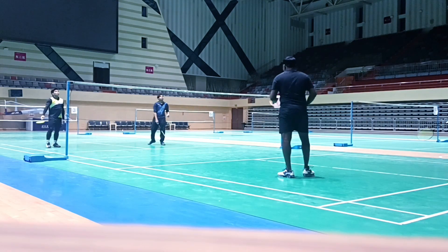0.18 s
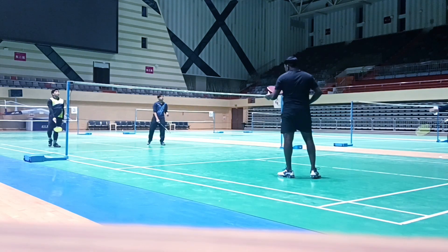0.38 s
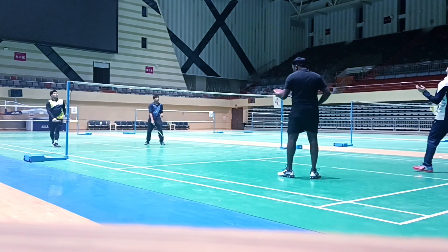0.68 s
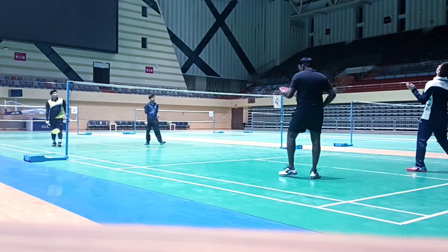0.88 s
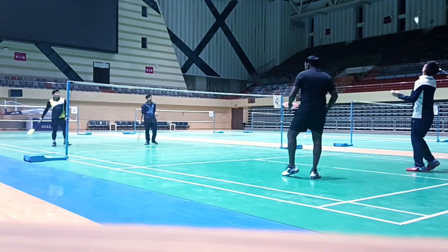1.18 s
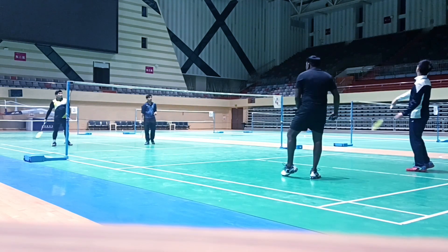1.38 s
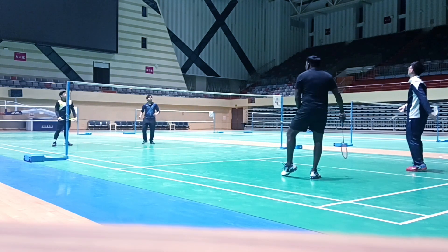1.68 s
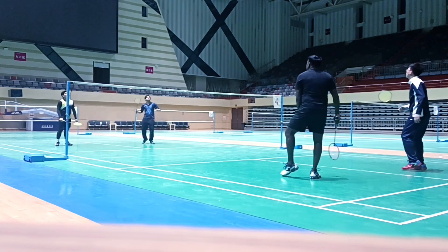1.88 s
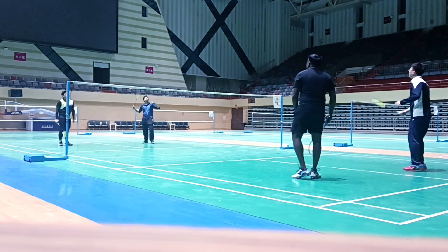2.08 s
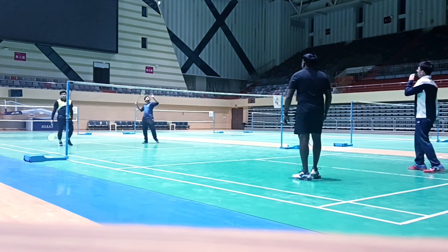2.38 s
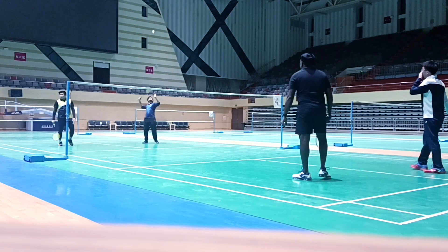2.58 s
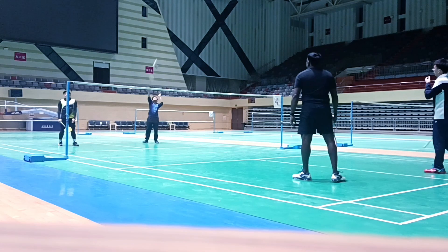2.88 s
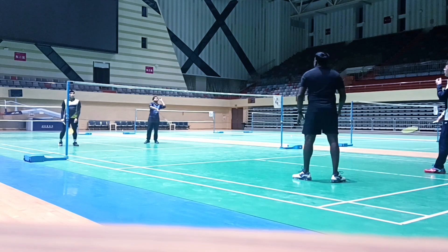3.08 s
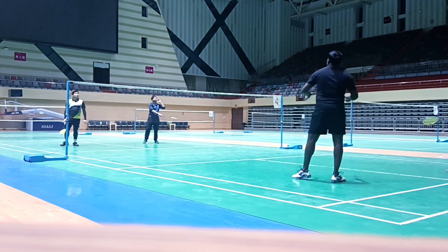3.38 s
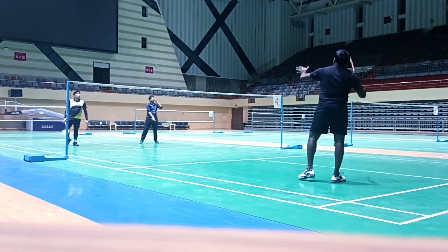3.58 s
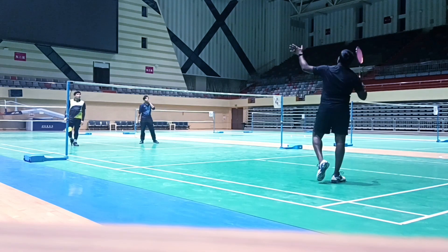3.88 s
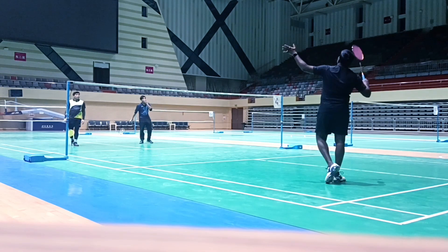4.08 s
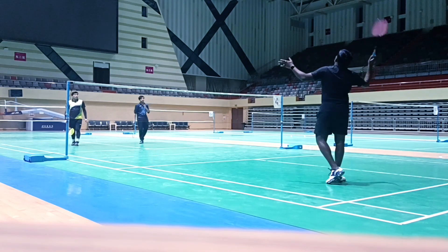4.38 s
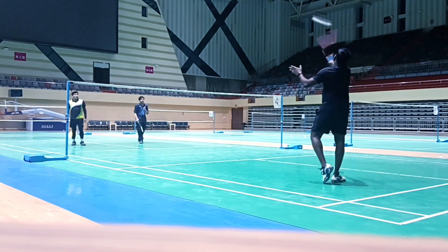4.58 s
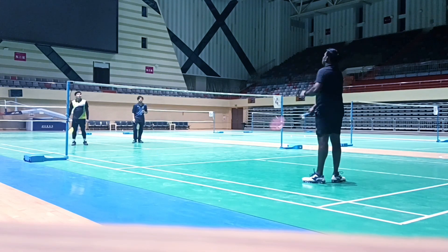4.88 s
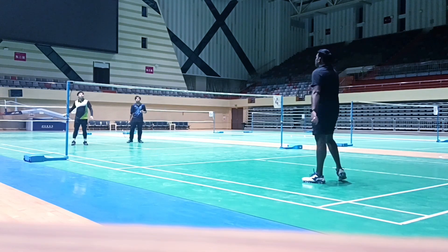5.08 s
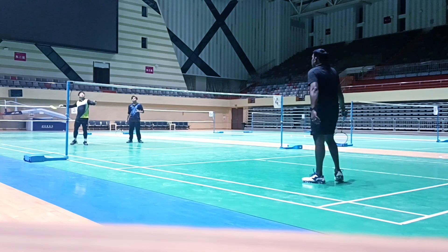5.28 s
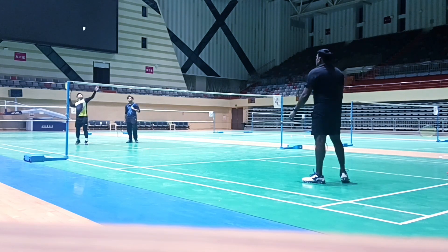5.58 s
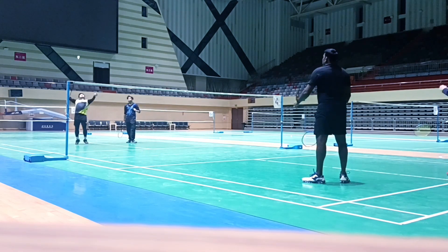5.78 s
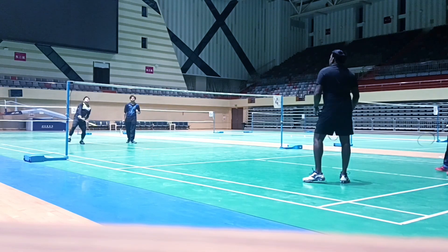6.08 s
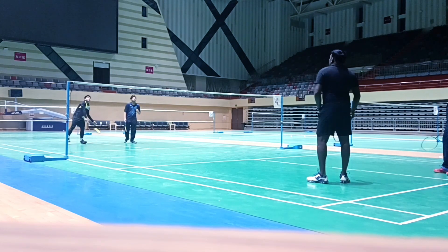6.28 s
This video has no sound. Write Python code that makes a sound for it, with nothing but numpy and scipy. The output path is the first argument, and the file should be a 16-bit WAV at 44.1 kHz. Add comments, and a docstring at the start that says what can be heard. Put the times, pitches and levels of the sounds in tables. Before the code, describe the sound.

The fading ring of an earlier hit opens the scene, with light footsteps on a hollow wooden floor. Then come four crisp racket pops, alternating between near and far players, the third nearest and strongest in its direct crack, the last followed by bright slapping echoes. Each tail washes through a huge indoor hall. Quiet air noise and faint hiss continue throughout, heard in stereo from courtside.

```python
"""A large, empty sports hall: a badminton rally heard from the side of the court.
Each stroke is a noise swish, a burst filtered by racket resonances and a ping of decaying sines.
Near wall, stands and court return shaped bursts and noise; the hall blooms and decays as diffuse noise.
Separate slaps return from far walls and roof. Shoes excite the modes of a sprung floor.
Below lie ventilation noise, a low hum, one swell of rustle and the recorder's hiss."""
import sys
import numpy as np
from scipy import signal
from scipy.fft import rfft, irfft
from scipy.io import wavfile
from scipy.ndimage import uniform_filter1d

SR = 44100
rng = np.random.default_rng(int(sys.argv[2]) if len(sys.argv) > 2 else 0)


def store_wav(level_fs):
    """Save 16-bit WAV to argv[1]."""
    pcm = np.round(np.clip(np.atleast_2d(level_fs), -1, 1) * 32767)
    wavfile.write(sys.argv[1], SR, pcm.T.astype(np.int16))


N = 284156

# Strokes. Each row: start in seconds, end of the court, crack level in dB, string note in Hz, its level
# in dB, string overtone in Hz, its level in dB, string T60 in seconds, near-wall delay in seconds,
# wall level in dB, hall level in dB, hall boom centre in Hz, boom surge in dB. Levels are before tone balance.
STROKES = [(1.5545, "near", -20, 957, -39, 1985, -45, 0.098, 0.011, -19.5, -21.5, 513, 2.5),
           (3.182, "far", -22, 1022, -35, 4050, -49, 0.12, 0.014, -20, -23, 540, 6),
           (4.86, "near", -15.5, 1540, -51, 6500, -39, .11, .0119, -17.5, -20.5, 750, -1.5),
           (6.2096, "far", -21, 1500, -37, 6960, -56, 0.242, .016, -22.5, -18.5, 590, 4)]
# Tone balance, a row a stroke: triples of low knock, middle bite and high sheen in dB,
# for the direct crack, the wall return and the hall.
TONE_BALANCE_DB = [((2.5, -2.5, -3), (2, 0, -1), (-1.5, 0.5, 0.5)), ((1.5, -1.5, -5.5), (-1.5, -3, -1),
                   (0, 1, -2)), ((1.5, -3.5, -5.5), (-2.5, .5, 3), (1, 0, 1.2)), ((-4.5, 2.5, -6.5),
                   (0, 4, -2), (1, 0.5, 1.5))]
# Resonances of racket and cork, a list a stroke. Each row: centre in Hz, half-width in Hz, level in dB.
RACKET_MODES = [
    [(434, 120, -4.5), (820, 117, 6.5), (1635, 105, 11.5), (1986, 160, 13.5), (2250, 150, 9),
     (2540, 190, 9), (3420, 96, 4.5), (3880, 170, 6.5), (4092, 150, 4), (5257, 78, -1), (6190, 390, 6.5),
     (7000, 690, 1.5)],
    [(330, 34, 6), (534, 110, 5), (1017, 45, 9.5), (2132, 310, 4.5), (2618, 220, 3), (3130, 160, 7),
     (4080, 470, 11.5), (4650, 190, 7.5), (5300, 90, -2.5), (6524, 190, -8), (6860, 86, 5), (7670, 130, -4)],
    [(250, 57, 3.5), (583, 128, 11.5), (755, 140, 12), (1520, 240, 12), (1990, 140, 11), (2220, 110, 7),
     (2795, 110, 4), (3160, 150, 5), (4102, 102, 0), (4528, 205, -3.5), (5670, 100, 3.5), (6500, 160, 6),
     (6780, 96, 8)],
    [(468, 92, 15.5), (890, 104, 15.5), (1452, 210, 12.5), (1780, 120, 1.5), (2260, 163, -3.5),
     (3100, 200, 6), (3930, 400, 6.5), (4730, 310, 5.5), (5700, 310, 12.5), (6250, 310, 7.5),
     (6970, 195, 14), (7540, 160, 8.5)],
]
# Broad crack of cork on strings under the resonances. Each row: frequency in Hz, level in dB.
CRACK_SPECTRUM = [(40, -26), (130, -7), (250, -7), (1200, -23), (2500, -6), (5000, -5), (7600, -2.5),
                  (13000, -7.5)]
# Two ends of the court by name. Each entry: left-right difference in dB, lead of the right ear in ms,
# wall left-right difference in dB, wall smear in seconds, wall scatter in dB, stands delay in seconds,
# stands level in dB re wall, hall boom in dB, boom delay in seconds.
COURT_ENDS = {"near": (-1.3, -.05, -1.5, .0065, 8.5, .0455, -8.4, 7.3, .075),
              "far": (-5.2, .3, 3.7, .0035, 6, .04, -13, 6.7, .055)}
# Swings before the strokes. Each row: start in seconds, length in seconds, level in dB before the
# loudness arch, top pitch in Hz.
SWINGS = [(1.533, 0.025, -41, 900), (3.136, .03, -52, 520), (4.809, 0.061, -40.5, 750),
          (6.156, 0.059, -49.5, 740)]
# Sound sent to the walls against the direct crack. Each row: frequency in Hz, difference in dB.
WALL_TILT = [(200, 1), (500, -0.5), (900, -7.5), (2000, 0.5), (4000, 0.6), (6700, 2), (13000, 2)]
# Short waves scatter, long ones arrive in one piece. Each row: frequency in Hz, scatter in dB.
SCATTER_SPECTRUM = [(400, -8), (1200, -2), (3000, 0.5), (8000, 1)]
# Hall reverberation. Each row: frequency in Hz, relative level in dB.
HALL_SPECTRUM = [(60, -19), (150, 1.5), (300, .5), (800, 4), (1030, 3.5), (1180, -3), (1550, 3),
                 (2000, 0.5), (3000, -0.5), (4500, 2), (5100, 0), (6700, -0.5), (8000, -6), (13500, -7)]
# Nominal hall decay; the bend of the decay curve slows it slightly. Each row: frequency in Hz, T60 in seconds.
HALL_T60_S = [(80, 2.1), (250, 1.9), (600, 2.09), (1500, 1.744), (4000, 1.256), (7000, 1.23), (14000, 1.05)]
# Slaps off far walls and roof, plus one return from the stands at 4.913 s. Each row: arrival in seconds, #
# level in dB, left-right difference in dB, favoured frequency in Hz.
ECHOES = [(1.728, -45, -3.5, 4500), (1.7333, -40, 2, 6300), (1.747, -41, 1, 2600), (1.798, -42.5, 0, 2400),
          (3.227, -42, 0.5, 2300), (3.264, -45, 3, 4500), (3.326, -42, 6, 1930), (3.418, -44, -2, 4500),
          (4.913, -37, 1, 3900), (4.954, -44.5, 11, 6600), (5.032, -38, 4, 2400), (5.056, -43.5, 3, 2800),
          (6.2736, -39, -4, 6680), (6.2856, -44, 1, 6700), (6.2935, -30.5, -2, 6300), (6.322, -34, 0, 550),
          (6.334, -30.5, -7, 4000), (6.351, -34, 5, 6360), (6.3636, -39.5, 4, 6800),
          (6.4313, -41, -2.5, 6600)]
# Slap filter. Each row: frequency in Hz, gain in dB.
ECHO_SPECTRUM = [(100, -27.5), (700, -4.5), (2000, -5), (4500, -1), (6800, -3.5), (13500, -4)]
# Firm footfalls. Each row: start in seconds, floor thud in dB, thud centre in Hz, sole click in dB,
# click centre in Hz.
STEPS = [(.612, -48, 130, -60, 400), (.859, -45.5, 100, -69, 500), (.901, -53, 130, -59.5, 1900),
         (1.104, -46.5, 119.6, -57, 900), (1.218, -47.5, 129, -52.5, 1150), (1.374, -49, 108, -59.5, 595),
         (2.174, -52.5, 170, -64, 400), (2.329, -45, 230, -54, 740), (2.4, -52, 140, -70, 400),
         (2.523, -51.5, 130, -72, 500), (2.786, -53, 150, -60.5, 3010), (2.87, -55.5, 109, -66, 1800),
         (3.051, -63, 130, -64, 3000), (3.064, -48, 120, -65, 2400), (3.24, -40.5, 210, -47.5, 497),
         (4.152, -61, 130, -62.5, 3000), (4.179, -40, 130, -56, 3230), (4.225, -45, 130, -74, 900),
         (4.281, -49, 260, -57.5, 2428), (4.296, -40.5, 100, -67, 2000), (4.342, -51, 100, -71, 599),
         (5.018, -37, 169, -40.5, 646), (5.848, -47, 230, -56, 3110), (5.935, -55, 180, -60, 500),
         (5.956, -45, 90.4, -61, 600), (6.302, -40, 102, -63.5, 600)]
# Thud filter. Each row: frequency in Hz, gain in dB.
THUD_SPECTRUM = [(30, -47.5), (55, -35), (80, -0.5), (130, 1), (200, -3), (330, -21), (700, -22),
                 (2000, -46), (8000, -69)]
# Sprung floor modes before each step's random shifts. Each row: frequency in Hz, level in dB, T60 in seconds.
FLOOR_MODES = [(81, -7, .11), (102, 1.5, .12), (127.6, -1.5, 0.067), (166, -1.5, 0.081), (218, 3, 0.086),
               (269, 7, 0.064), (355, 6.5, 0.0343)]
# Ventilation. Each row: frequency in Hz, relative level in dB.
AIR_SPECTRUM = [(20, -14), (40, -4), (60, -1), (80, 2), (100, -5.5), (125, 1.5), (200, -2), (320, -2.5),
                (600, -3), (1000, -10), (2000, -17), (4500, -18.5), (7000, -22.5), (14000, -19.5)]
# Far rustle. Each row: frequency in Hz, relative level in dB.
RUSTLE_SPECTRUM = [(100, -18), (500, -5), (1500, 5.5), (3000, 0), (4500, 3), (5300, 1.5), (6700, 4),
                   (8000, -3), (13500, -15)]
# Likeness of the ears in diffuse sound. Each row: frequency in Hz, left-right correlation from -1 to 1.
EAR_LIKENESS = [(25, 0.69), (70, 1), (150, 0.7), (350, 0.73), (700, 0.3), (1400, -0.15), (2500, -0.0035),
                (5000, 0.027), (14000, -0.02)]
# Balance of diffuse sound. Each row: frequency in Hz, left-right difference in dB.
EAR_BALANCE = [(100, -1.5), (700, 0.47), (2000, 1.62), (7000, 2.5), (13000, 0.5)]
# Recorder response: bass cut, uneven treble, deep notch. Each row: frequency in Hz, gain in dB.
RECORDER_RESPONSE = [(20, -13), (40, -18.5), (72, 0), (4400, -2.5), (4700, 1), (4830, -5.5), (6000, -3),
                     (6600, 1.2), (7200, -1.5), (7620, -0.5), (7800, -13.5), (8450, -16.5), (8750, -45.5),
                     (11150, -61), (11650, -4.5), (12700, -3), (13100, -3), (14200, 2), (14550, -33),
                     (15500, -38)]
# Recorder's own noise. Each row: frequency in Hz, level in dB re the hiss level.
HISS_SPECTRUM = [(8000, 10.5), (11000, 6.5), (14200, -2), (14700, -10)]


def rally():
    """Sums strokes, swishes and reflections; the hall still rings from an earlier stroke."""
    out = np.zeros((2, N))
    earlier = hall(db=-21.0, boom_hz=491, boom_db=3.5, boom_s=0.051, surge_db=9.5,
                   colour=crack_colour(RACKET_MODES[-1]))
    add(out, -.3, earlier)
    for start_s, length_s, db, top_hz in SWINGS:
        add(out, start_s, swish(length_s, db, top_hz))
    for stroke, modes, balances in zip(STROKES, RACKET_MODES, TONE_BALANCE_DB):
        add_stroke(out, stroke, modes, balances)
    for arrival_s, db, pan_db, centre_hz in ECHOES:
        add(out, arrival_s, far_slap(db, pan_db, centre_hz))
    return out


def add_stroke(out, stroke, modes, balances):
    """The direct crack, then court, near wall, stands and hall, each fed by the racket's own colour."""
    (s, end, db, note_hz, note_db, overtone_hz, overtone_db, string_t60_s,
     wall_s, wall_db, hall_db, boom_hz, surge_db) = stroke
    (pan_db, lead_ms, wall_pan_db, smear_s, scatter_db,
     stands_s, stands_db, boom_db, boom_s) = COURT_ENDS[end]
    direct_balance, wall_balance, hall_balance = balances
    court_db = -12  # re crack
    crack = crack_colour(modes)
    sideways = towards_walls(crack)
    strings = [(note_hz, note_db), (overtone_hz, overtone_db)]

    direct = racket(db, pan_db, lead_ms, strings, crack, string_t60_s)
    add(out, s, balanced(direct, *direct_balance))
    add(out, s, court(db + court_db, sideways))
    wall = near_wall(wall_db, smear_s, scatter_db, sideways)
    add(out, s + wall_s, balanced(wall, *wall_balance) * sides(wall_pan_db))
    add(out, s + stands_s, balanced(stands(wall_db + stands_db, sideways), *wall_balance))
    reverb = hall(hall_db, boom_hz, boom_db, boom_s, surge_db, sideways)
    add(out, s, balanced(reverb, *hall_balance))


def racket(db, pan_db, lead_ms, strings, colour, string_t60_s):
    """Cork meets strings: a resonant crack, and the string bed rings in a few decaying sines."""
    crack = sized(coloured(burst(smear_s=0.0017, scatter_db=6.0, lead_ms=lead_ms), colour), db)
    t = np.arange(crack.shape[1]) / SR
    ping = sum(amp(mode_db - 60 * t / string_t60_s) * np.sin(2 * np.pi * hz * t) for hz, mode_db in strings)
    return (crack + ping) * sides(pan_db)


def crack_colour(modes):
    """Adds the power of the racket's resonances to that of the broad crack."""
    hz = np.geomspace(40, 14000, 700)
    peaks = sum((amp(db) / (1 + ((hz - centre_hz) / width_hz) ** 2)) ** 2
                for centre_hz, width_hz, db in modes)
    broad = amp(read(CRACK_SPECTRUM, hz)) ** 2
    return np.c_[hz, 10 * np.log10(peaks + broad)]


def balanced(x, knock_db, bite_db, sheen_db):
    """Raises or lowers low knock, middle bite and high sheen."""
    balance = [(200, knock_db / 2), (700, knock_db), (1800, bite_db), (2600, bite_db),
               (4000, (bite_db + sheen_db) / 4), (6700, sheen_db), (12000, 0)]
    return coloured(x, balance)


def swish(length_s, db, top_hz, width_hz=140, glide=0.475):
    """Air whistles round the shaft: a noise peak rises in pitch as the swing speeds up, loudest late."""
    def whistle_db(hz, t):
        """One spectral peak gliding upwards."""
        centre_hz = top_hz * (1 - glide + glide * t / length_s)
        return -20 * np.log10(1 + ((hz - centre_hz) / width_hz) ** 2)
    x = diffuse(round(length_s * SR), whistle_db)
    arch = np.sin(np.pi * np.linspace(0, 1, x.shape[1]) ** 2)
    return amp(db) * x / x.std() * arch


def court(db, colour, fade_s=0.025, rise_s=0.0038, size=4096):
    """Floor, net posts and players scatter the crack before the walls answer."""
    t = np.arange(size) / SR

    def level_db(hz, s):
        """Crack colour with a rise at 4 kHz."""
        return read(colour, hz) + hump(hz, centre_hz=4000, db=9, octaves=0.6)
    scatter = diffuse(size, level_db, grain_db=2)
    return sized(scatter * np.minimum(t / rise_s, 1) * np.exp(-t / fade_s), db)


def towards_walls(colour, share=0.77):
    """The crack as it leaves the racket sideways: less peaked, a little brighter."""
    hz, db = colour.T
    return np.c_[hz, share * db + read(WALL_TILT, hz)]


def near_wall(db, smear_s, scatter_db, colour):
    """One smeared reflection, its spike reaching the left ear first."""
    return sized(coloured(burst(smear_s, scatter_db, lead_ms=-0.54), colour), db)


def stands(db, colour, spread_s=0.015, size=2048):
    """Rows of seats return a quick rattle of reflections, stronger on the left."""
    t = np.arange(size) / SR
    fall_db = -5 * t / spread_s - 1800 * np.maximum(t - spread_s, 0)  # slow, then steep
    rattle = rng.standard_normal((2, size)) * amp(fall_db)
    return sized(coloured(rattle, colour), db) * sides(db=6)


def hall(db, boom_hz, boom_db, boom_s, surge_db, colour, hold_s=0.17, bloom_s=0.022,
         boom_octaves=0.77, imprint=0.25, surge_s=0.1):
    """Reverberation holds while sound crosses the hall, then decays; a late boom surges or dips once."""
    def level_db(hz, t):
        """Colour, boom, unevenness and decay."""
        swell = boom_db * (1 + np.tanh((t - boom_s) / bloom_s)) / 2
        surge = surge_db * np.exp(-((t - surge_s) / 0.061) ** 2)
        band = np.exp(-abs(np.log2((hz + 1) / boom_hz) / boom_octaves) ** 4)
        # fine ripple in frequency; reflections in clumps
        ripple = 1.6 * patches(hz, t[:1], 1, 1)
        clumps = 1.2 * patches(hz, t, 14, 4) + 1.1 * patches(hz, t, 90, 3)
        early = 4 * np.exp(-t / 0.048)
        age_s = np.logaddexp(0, (t - hold_s) / 0.03082) * 0.02893  # near zero until the hold ends
        decay = -60 * age_s / read(HALL_T60_S, hz)
        tone = read(HALL_SPECTRUM, hz) + imprint * read(colour, hz)
        return tone + (swell + surge) * band + ripple + clumps + early + decay
    length = 2 * SR
    onset = np.minimum(np.arange(length) / SR / 0.0076, 1)
    return sized(diffuse(length, level_db, grain_db=3.5) * onset, db)


def far_slap(db, pan_db, centre_hz):
    """A far wall, the roof or the stands return a short burst with one region brought forward."""
    spectrum = favouring(ECHO_SPECTRUM, centre_hz, db=16, octaves=0.514)
    slap = coloured(burst(smear_s=0.0028, scatter_db=7.5), spectrum)
    return sized(slap, db) * sides(pan_db)


def footsteps(wall_s=.014):
    """Floor thuds and sole clicks, each returned by the near wall and softly by the hall."""
    out = np.zeros((2, N))
    for s, thud_db, thud_hz, click_db, click_hz in STEPS + shuffles():
        boards = favouring(THUD_SPECTRUM, thud_hz, db=7.0, octaves=0.87)
        sole = [(click_hz / 16, -18), (click_hz / 2, -2), (click_hz * 1.7, 0),
                (click_hz * 4, -22), (click_hz * 16, -35)]
        thud = floor_thud(thud_db, boards)
        click = sized(coloured(burst(smear_s=.0015, scatter_db=6), sole), click_db)
        for sound, wall_db in [(thud, -8), (click, -5.5)]:
            add(out, s, sound)
            add(out, s + wall_s, sound * amp(wall_db))
        add(out, s, step_tail(SR // 2, boards, 1.03, thud_db - 4.0))
        add(out, s, step_tail(SR, sole, 1.2, click_db - 0.5))
    return out


def floor_thud(db, boards):
    """Decaying sine modes of the sprung floor; each spot rings differently."""
    t = np.arange(SR // 4) / SR
    mode_hz, mode_db, t60_s = np.transpose(FLOOR_MODES)[:, :, None]
    detune, strength = rng.standard_normal((2, len(FLOOR_MODES), 1))
    level = amp(mode_db + 2 * strength - 60 * t / t60_s)
    thud = (level * np.sin(2 * np.pi * mode_hz * (1 + 0.038 * detune) * t)).sum(0)
    return sized(coloured(np.array([thud, thud]), boards), db)


def step_tail(length, spectrum, t60_s, db):
    """The hall's soft answer: diffuse noise decaying at one rate."""
    return sized(diffuse(length, lambda hz, age_s: read(spectrum, hz) - 60 * age_s / t60_s), db)


def shuffles(gap_s=0.52, thud_db=-57.5, thud_hz=127.6, click_db=-76, click_hz=1500):
    """Light steps at loose intervals, rows as in STEPS; level and click pitch vary about the settings."""
    times_s = np.arange(gap_s, N / SR, gap_s)
    draws = rng.uniform(-0.36, 0.46, (len(times_s), 3))
    return [(s + gap_s * late, thud_db + 6 * force, thud_hz, click_db + 6 * force, click_hz * 4 ** bright)
            for s, (late, force, bright) in zip(times_s, draws)]


def ambience(air_db=-57.0, hum_hz=101, hum_db=-63, rustle_db=-61):
    """Ventilation noise with a wavering narrow-band hum; a faint far rustle swells once."""
    t = np.arange(N) / SR
    air = diffuse(N, lambda hz, s: read(AIR_SPECTRUM, hz) + 1.35 * patches(hz, s, 10, 8), size=2048)
    hum = diffuse(N, lambda hz, s: -40 * np.log10(1 + ((hz - hum_hz) / 9) ** 2), size=16384)
    rustle = diffuse(N, lambda hz, s: read(RUSTLE_SPECTRUM, hz))
    swell = np.exp(-((t - 1.10) / 0.21) ** 2)
    out = amp(air_db) * air / air.std()
    out += amp(hum_db) * hum / hum.std()
    out += amp(rustle_db) * swell * rustle / rustle.std()
    return out


def burst(smear_s, scatter_db, lead_ms=0, size=4096):
    """A pressure spike and scattered sound decaying exponentially with smear_s; white overall."""
    t = np.arange(size) / SR
    scatter = diffuse(size, lambda hz, s: read(SCATTER_SPECTRUM, hz)) * np.exp(-t / smear_s)
    # positive lead: right ear first
    delay = np.round(np.maximum([[lead_ms], [-lead_ms]], 0) * SR / 1000)
    spike = np.sinc(np.arange(size) - delay)
    x = sized(scatter, scatter_db) + sized(spike, 0)
    power = uniform_filter1d((abs(rfft(x)) ** 2).sum(0), size=20)
    whitening = np.c_[np.fft.rfftfreq(size, 1 / SR), -10 * np.log10(power + 1e-9)]
    return coloured(x, whitening)[:, :size]


def diffuse(length, level_db, size=512, grain_db=0):
    """Noise from all sides shaped by level_db(Hz, s); ears alike in the bass, independent in the treble."""
    white = rng.standard_normal((2, length)) * amp(grain_db * rng.standard_normal((2, length)))
    overlap = size * 3 // 4
    hz, t, (a, b) = signal.stft(white, SR, nperseg=size, noverlap=overlap)
    same = np.clip(read(EAR_LIKENESS, hz), -1, 1)[:, None]
    mid, side = a * np.sqrt(1 + same), b * np.sqrt(1 - same)
    balance = sides(read(EAR_BALANCE, hz))[:, :, None]
    ears = np.array([mid + side, mid - side]) * balance * amp(level_db(hz[:, None], t))
    return signal.istft(ears, SR, nperseg=size, noverlap=overlap)[1][:, :length]


def patches(hz, t, bins, frames):
    """Smoothed random field of unit spread over frequency and time."""
    field = rng.standard_normal((len(hz), len(t)))
    field = uniform_filter1d(uniform_filter1d(field, bins, axis=0), frames, axis=1)
    return field / field.std()


def coloured(x, spectrum, size=4096):
    """Minimum-phase (causal) filter with this (Hz, dB) spectrum."""
    log_gain = np.log(amp(read(spectrum, abs(np.fft.fftfreq(size, 1 / SR)))))
    response = np.exp(np.conj(signal.hilbert(log_gain)))
    taps = np.fft.ifft(response).real[:size // 2]
    return signal.fftconvolve(x, taps[None], axes=1)


def favouring(spectrum, centre_hz, db, octaves):
    """A spectrum with one region brought forward."""
    hz = np.geomspace(20, 16000, 150)
    return np.c_[hz, read(spectrum, hz) + hump(hz, centre_hz, db, octaves)]


def hump(hz, centre_hz, db, octaves):
    """A broad rise in dB around one frequency."""
    return db * np.exp(-(np.log2((hz + 1) / centre_hz) / octaves) ** 2)


def sized(x, db):
    """Scales a stereo sound so that its energy per channel, packed into 10 ms, has this RMS level."""
    return x * amp(db) * np.sqrt(.01 * SR * len(x) / (np.sum(x ** 2) + 1e-20))


def amp(db):
    """Decibels to gain."""
    return 10 ** (np.asarray(db) / 20)


def read(points, hz):
    """Interpolates (Hz, value) rows on a log-frequency axis."""
    f, value = np.transpose(points)
    return np.interp(np.log(hz + 1), np.log(f + 1), value)


def sides(db):
    """Left and right gains for a level difference."""
    return amp(np.array([db, -db]) / 2).reshape(2, -1)


def add(mix, s, sound):
    """Mixes a stereo sound in at time s, trimming what falls outside."""
    start = round(s * SR)
    sound = sound[:, max(-start, 0):]
    part = mix[:, max(start, 0):][:, :sound.shape[1]]
    part += sound[:, :part.shape[1]]


def scene():
    """Rally, footsteps and the hall's own noise."""
    return rally() + footsteps() + ambience()


def record(dry, hiss_db=-87, edge_hz=15375):
    """Applies the recorder's uneven response, faint hiss and band limit."""
    hz = np.fft.rfftfreq(2 * N, 1 / SR)
    hiss = rfft(rng.standard_normal((2, 2 * N))) * amp(hiss_db + read(HISS_SPECTRUM, hz))
    heard = irfft(rfft(dry, 2 * N) * amp(read(RECORDER_RESPONSE, hz)) + hiss)[:, :N]
    low_pass = signal.firwin(511, edge_hz, window=("kaiser", 9), fs=SR)
    return signal.oaconvolve(heard, low_pass[None], "same")


dry = scene()
out = record(dry)
store_wav(out)
```